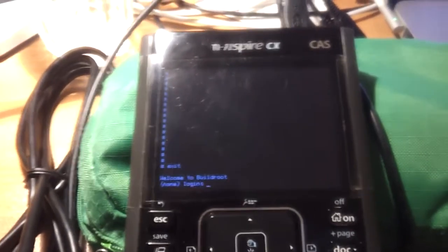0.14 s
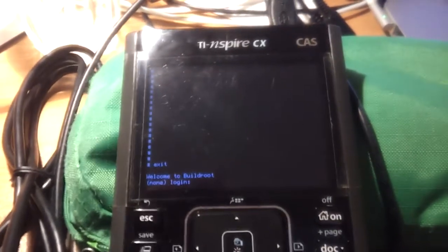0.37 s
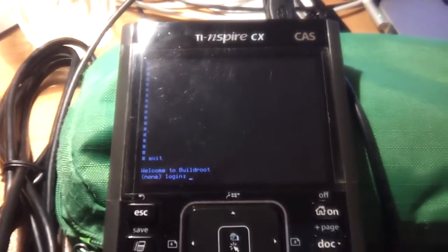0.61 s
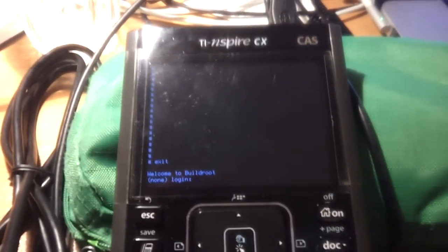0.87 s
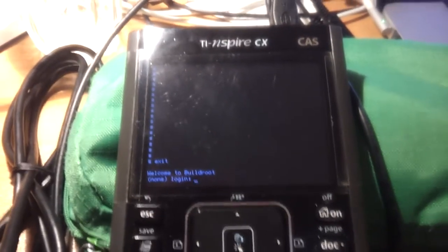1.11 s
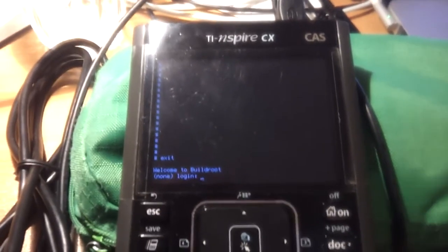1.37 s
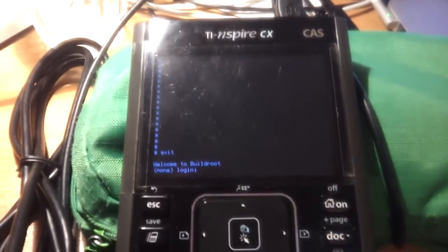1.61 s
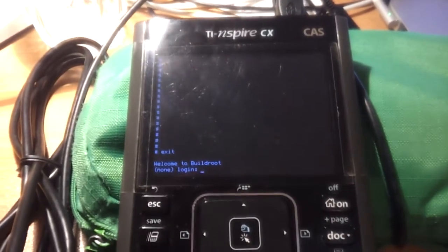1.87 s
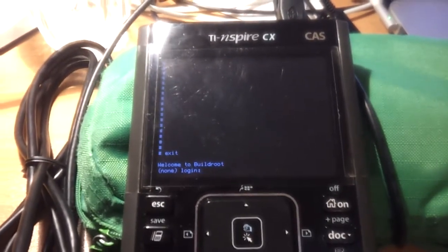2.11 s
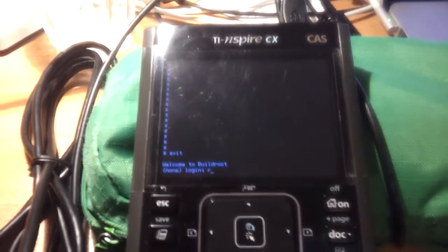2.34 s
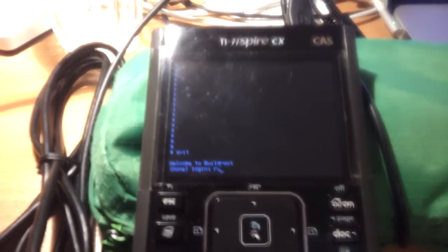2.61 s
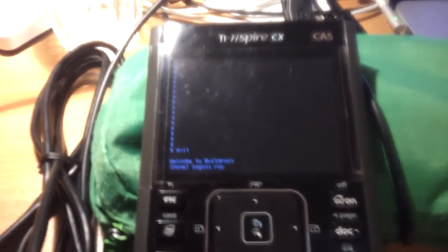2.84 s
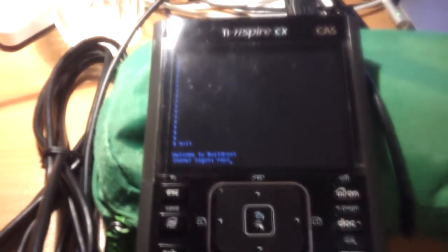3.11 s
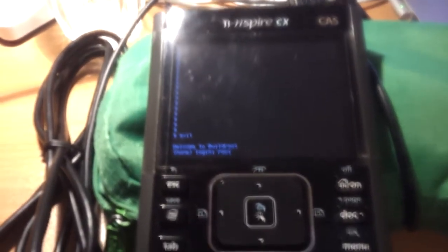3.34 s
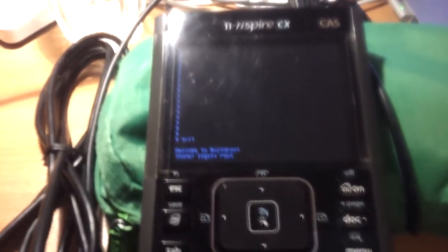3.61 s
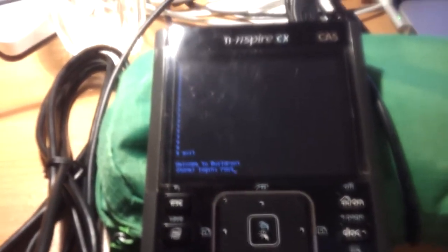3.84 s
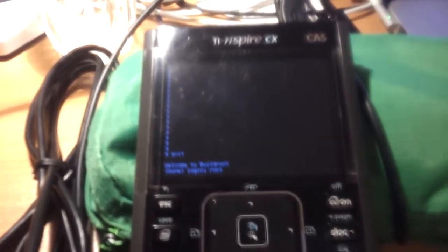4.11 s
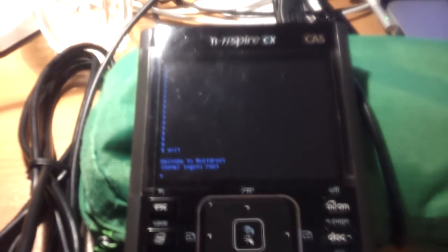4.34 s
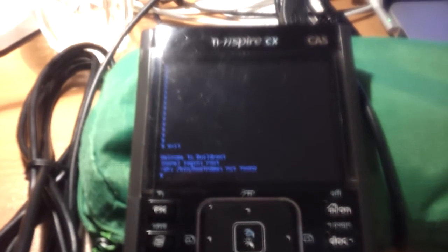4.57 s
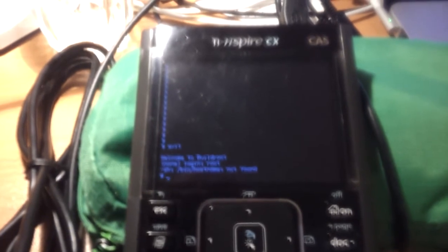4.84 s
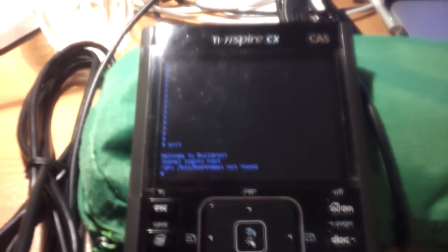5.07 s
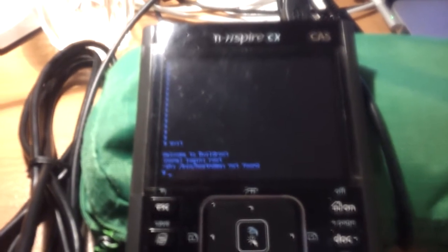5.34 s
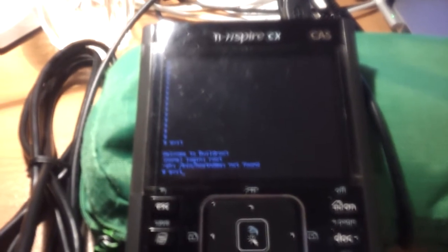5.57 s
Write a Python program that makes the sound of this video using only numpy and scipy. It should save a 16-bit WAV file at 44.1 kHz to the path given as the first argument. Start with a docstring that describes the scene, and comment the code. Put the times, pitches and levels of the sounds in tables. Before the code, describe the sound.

In a quiet room, one faint snap and handling bumps, then a quick burst of loud plastic key clicks and a later lone press.

```python
"""Typing in a quiet room

Someone types on a plastic keyboard just to the right of a hand-held camera. Each key lands, bounces and
springs back in short contacts: sparse pushes that drive decaying modes of cap, stem, plate and case.
The desk thuds (low modes), something snaps (struck modes), bumps are damped low swings and a finger rubs
the left microphone (grainy noise). A far motor drones (gliding sine) over rumble, hiss and a faint whine."""
import sys
import numpy as np
from scipy import signal
from scipy.fft import rfft, irfft
from scipy.io import wavfile
from scipy.ndimage import uniform_filter1d

SR = 44100
rng = np.random.default_rng(int(sys.argv[2]) if len(sys.argv) > 2 else 0)


def linear_from_db(decibels):
    """Turn decibels (scalar or array-like) into linear amplitude factors; 0 gives 1."""
    return 10 ** (np.asarray(decibels, float) / 20)


def wrap_up_sound(samples):
    """Save the sound to the file named by the first command line argument, as 16-bit audio."""
    columns = np.atleast_2d(samples).T
    # keep every value between -1 and 1, then stretch to whole-number steps
    tamed = np.clip(columns, -1, 1)
    steps = np.round(tamed * 32767).astype(np.int16)
    wavfile.write(sys.argv[1], SR, steps)


N = 251370

# Room rumble spectrum. Each row: frequency in Hz, relative level in dB.
RUMBLE_HZ_DB = [(12, -48), (20, -8.5), (59, 0.5), (90, 0.5), (119, 1), (188, -1), (218, -10.5), (299, -4.5),
                (361, -6.5), (549, -19), (636, -11.5), (2150, -39), (3000, -50.5), (3900, -67),
                (6600, -120)]
# Rumble swell. Each row: time in seconds, rms in dB midway between left and right.
RUMBLE_SWELL_S_DB = [(0.0, -59.5), (2.98, -56.5), (4.13, -60), (5.22, -56.5), (5.7, -59)]
# Hiss spectrum, falling steeply at the top. Each row: frequency in Hz, relative level in dB.
HISS_HZ_DB = [(12, -41), (20, -5), (105, -0.5), (331, -2.5), (549, -6.5), (936, -6.5), (1840, -11.5),
              (13900, -16.5), (15100, -15.5), (16400, -43)]
HISS_RMS_DB, WHINE_HZ, WHINE_PEAK_DB = -53, 14210, -72

# Snap modes. Each row: frequency in Hz, relative level in dB, t60 in seconds.
SNAP_MODES = [(2600, 3, 0.0028), (4700, -15, 0.0042), (6630, -9, 0.0038), (9800, -6.5, 0.0035),
              (12100, -6, 0.0035), (14200, -7, .003)]
SNAP_S, SNAP_PEAK_DB = .3449, -19.5
SNAP_PAN_DB = KEYS_PAN_DB = -7  # left minus right, before the far-side shading of SHADE_HZ_DB

# Finger on the left microphone. Each row: time in seconds, left rms in dB.
RUB_S_DB = [(.835, -61), (.85, -49), (.865, -43.5), (.874, -33.5), (.878, -49), (.895, -58), (.91, -75)]
# Bumps against the camera body. Each row: start in seconds, left starting level in dB,
# left minus right in dB, settled frequency in Hz, t60 in seconds.
THUDS = [(0.872, -33, 33, 71, 0.1), (0.98, -39, 20, 70, 0.077), (1.051, -27.5, 22, 110, 0.033),
         (5.381, -41, 7, 65, 0.28), (5.47, -46.5, 8, 60, 0.065)]

# Key contacts. Each row: start in seconds, cap peak at right in dB, then case and stem against cap in dB.
CONTACTS = [(2.1652, -9, -25, -5), (2.1688, -14.5, -24, 7.5), (2.1771, -0.5, -19, -8),
            (2.1879, -37, 1, -18), (2.2368, -29, -14, -6), (2.2453, -23, -17, -10), (2.253, -21, -16, -6),
            (2.257, -22, -17, -2), (2.2609, -24.5, -18, -10), (2.531, 0, -25.5, -8.5),
            (2.535, -8, -15.5, 5.5), (2.543, -24, 3, -14), (2.6023, -16.5, -16.5, -5),
            (2.6082, -23, -8, -6), (2.6155, -34.5, -10, 4), (2.682, -5.5, -38, 3.5),
            (2.6846, -10, -14.5, 1), (2.7016, -17, -0.5, -10), (2.692, -26, 2, -2), (2.7129, -32, 2, -11),
            (2.762, -24.5, -3.5, 2), (2.7771, -11.5, -12, -8.5), (2.9805, -19, -7.5, 10.5),
            (2.9829, -14.5, -24, 10.5), (2.9896, -29, -2, 6), (3.0422, -15, -13.5, 1.5),
            (3.0545, -28, -6, 2.5), (3.0575, -16, -15.5, -2.5), (3.0628, -23, -11, -11),
            (3.6668, -45, -5, -5), (4.2367, -14, -13, -3), (4.2383, -6.5, -8.5, -5.5),
            (4.2453, -10.5, -9, -7), (4.3134, -39.5, 3, -7.5), (4.3226, -33.5, 3, -1),
            (4.3379, -46, 4, -12), (5.3093, -42, -10, -5), (5.3672, -40.5, -10, 3),
            (5.3743, -29.5, -11, -3), (5.4724, -41, -13, 7), (5.4869, -35, 2.5, -5.5),
            (5.4961, -29.5, -18, 0), (5.508, -37, -21, -7)]
# Keystrokes. Each row: landing in seconds, plate boost in dB, desk blow in dB,
# best case frequency in Hz, best cap frequency in Hz.
KEYS = [(2.178, -1.5, -34, 1000, 3980), (2.532, 3.5, -42.5, 1070, 5700), (2.68, 0, -45.5, 1150, 5000),
        (2.983, 3, -34.5, 1370, 4780), (3.66, 3, -75, 1000, 3500), (4.237, 6, -30, 1000, 4200),
        (5.3, 3, -70, 980, 3400)]
# Modes of the four parts. Each row: frequency in Hz, relative level in dB, t60 in seconds.
CASE_MODES = [(720, -12, .02), (880, 0, .04), (1030, 0, .045), (1150, -1, .035), (1350, -1, .025)]
PLATE_MODES = [(1810, -38, .012), (1900, 8.5, 0.025), (1990, -1, 0.015), (2410, 19.5, 0.0049),
               (2770, 22, 0.0028)]
CAP_MODES = [(3600, -3, 0.012), (3900, 0.5, 0.009), (4320, 0, 0.012), (4870, 0.7, 0.0098),
             (5464, 1.5, 0.013)]
STEM_MODES = [(6300, -1, .006), (7300, 0, .007), (8200, 0, .007), (8900, -4, .005), (10400, -18, .003)]
PLATE_BEST_HZ, STEM_BEST_HZ = 2300, 7130
# the plate sits between stem and case and follows a share of each
PLATE_DB, PLATE_DB_PER_CASE_DB, PLATE_DB_PER_STEM_DB = 1, 0.33, 0.48
# a hard contact is clean and short, a soft one rattles longer
RATTLE_MS_AT_0_DB, RATTLE_MS_PER_DB = 1.7, 0.1053
# after a hard contact the cap chatters on: taps of uneven strength and gaps, weakening on the whole
HARD_DB, CHATTER_DB, CHATTER_FALL_DB, CHATTER_GAP_MS = -13, -30, 2.7, 7.1
CHATTER_SCATTER_DB, CHATTER_CASE_DB, CHATTER_STEM_DB = 2.5, -9, 3.5
# Shading of the far (left) microphone. Each row: frequency in Hz, left over right in dB.
SHADE_HZ_DB = [(300, 1), (700, 0), (1300, -3), (2400, -8), (4400, -5.5), (8000, -1.5), (15000, -1)]
LEFT_LAG_MS = 0.115

# Room tail bands. Each row: centre in Hz, t60 in seconds, relative level in dB.
ROOM_BANDS = [(480, 0.28, 17), (1000, 0.26, -2.5), (1960, 0.23, 5), (3880, 0.22, 0), (6430, 0.35, -1),
              (8100, 0.16, -3)]
ROOM_DB, ROOM_TOP_HZ = -20.5, 8900
# Desk top modes. Each row: frequency in Hz, relative level in dB, t60 in seconds.
DESK_MODES = [(42.4, -12, .2), (70, 3, 0.12), (117.9, 3.5, 0.3), (187, -8.5, 0.17), (244, -5, 0.18),
              (330, 5.5, 0.19), (406, 12, 0.062), (502, 8, 0.043)]
DESK_SPREAD_MS = 15.3  # the blow reaches the desk through feet and cloth
# Far motor. Each row: time in seconds, frequency in Hz, rms in dB midway between left and right.
DRONE_S_HZ_DB = [(4.45, 114.6, -62), (4.96, 127.4, -55.5), (5.114, 128.4, -55.5), (5.7, 112, -58.5)]


def along(table, at):
    """Reads a two-column table on a log-frequency axis."""
    hz, value = np.transpose(table)
    return np.interp(np.log(np.maximum(at, 1)), np.log(hz), value)


def colour(x, table):
    """Filters by (Hz, dB) points."""
    size = x.shape[-1]
    bin_hz = np.arange(size // 2 + 1) * SR / size
    return irfft(rfft(x) * linear_from_db(along(table, bin_hz)), size)


def unit(x):
    """Scales to rms 1."""
    return x / np.sqrt(np.mean(x ** 2))


def add(track, s, sound):
    """Mixes a short sound in at s seconds."""
    start = int(s * SR)
    track[:, start:start + sound.shape[1]] += sound[:, :N - start]


def ring(modes, push, chance, best_hz, focus_db=12):
    """Decaying modes driven by a push, strongest near best_hz; chance weights and tunes them. Peak 1."""
    hz, db, t60_s = np.transpose(modes)[:, :, None]
    t = np.arange(len(push)) / SR
    level_chance, tune_chance = chance[:, :len(modes), None]
    db = db - focus_db * np.abs(np.log2(hz / best_hz))  # focus_db per octave
    gains = linear_from_db(db + 2.5 * level_chance)
    tones = np.sin(2 * np.pi * hz * (1 + .02 * tune_chance) * t)
    response = np.sum(gains * tones * 1000. ** (-t / t60_s), axis=0)
    out = signal.fftconvolve(push, response)[:len(push)]
    # a part radiates little outside the range of its modes
    band = signal.butter(3, [.8 * hz.min(), 1.1 * hz.max()], "band", fs=SR, output="sos")
    out = signal.sosfilt(band, out)
    return out / np.max(np.abs(out))


def background(t):
    """Rumble is shared by both microphones, stronger left; hiss is separate in each; a faint whine wavers."""
    rumble = unit(colour(rng.standard_normal(N), RUMBLE_HZ_DB))
    rumble = rumble * linear_from_db(np.interp(t, *np.transpose(RUMBLE_SWELL_S_DB)))
    hiss = linear_from_db(HISS_RMS_DB) * unit(colour(rng.standard_normal((2, N)), HISS_HZ_DB))
    waver = unit(uniform_filter1d(rng.standard_normal(N), size=600))
    whine = linear_from_db(WHINE_PEAK_DB) * np.sin(2 * np.pi * np.cumsum(WHINE_HZ + 30 * waver) / SR)
    return rumble * linear_from_db([[2.5], [-2.5]]) + hiss + whine * linear_from_db([[3], [-3]])


def snap():
    """One impulse sets off a few quickly damped modes nearby."""
    track, impulse = np.zeros((2, N)), signal.unit_impulse(2500)
    sound = ring(SNAP_MODES, impulse, rng.standard_normal((2, len(SNAP_MODES))), 2500, focus_db=0.5)
    add(track, SNAP_S, sound * linear_from_db([[SNAP_PEAK_DB + SNAP_PAN_DB], [SNAP_PEAK_DB]]))
    return track


def rub(t):
    """Skin slides over the left port, grainy and narrow, and stops with a tick."""
    band = signal.butter(6, [4900, 7100], "band", fs=SR, output="sos")
    grains = unit(signal.sosfilt(band, rng.standard_normal(N) ** 3))
    level_db = np.interp(t, *np.transpose(RUB_S_DB), left=-120, right=-120)
    return grains * linear_from_db(level_db) * linear_from_db([[0], [-14]])


def thuds():
    """One damped low swing each, quick at first and slowing."""
    track, t = np.zeros((2, N)), np.arange(SR // 4) / SR
    for s, db, pan_db, hz, t60_s in THUDS:
        turns = hz * t + 0.28 * (1 - np.exp(-t / 0.0012))
        swing = -np.sin(2 * np.pi * turns) * 1000. ** (-t / t60_s)
        add(track, s, swing * linear_from_db([[db], [db - pan_db]]))
    return track


def chatter(count=7):
    """Rows like CONTACTS for the small taps that follow each hard contact."""
    rows = []
    for s, db, *_ in CONTACTS:
        if db > HARD_DB:
            gaps_ms = CHATTER_GAP_MS * (.5 + rng.random(count))
            scatter_db = CHATTER_SCATTER_DB * rng.standard_normal((3, count))
            times_s = s + np.cumsum(gaps_ms) / 1000
            levels_db = db + CHATTER_DB - CHATTER_FALL_DB * np.arange(count) + scatter_db[0]
            rows += zip(times_s, levels_db, CHATTER_CASE_DB + scatter_db[1], CHATTER_STEM_DB + scatter_db[2])
    return rows


def contact_push(db, t_ms):
    """A first tap, a dying rattle of smaller ones and the scrape of the stem in its guide."""
    noise = rng.standard_normal(len(t_ms))
    rattle_ms = np.clip(RATTLE_MS_AT_0_DB - RATTLE_MS_PER_DB * db, .1, 12)
    # cubed noise is sparse: separate small impacts rather than a hiss
    # a long rattle is a glancing contact, so its first tap stands out less
    push = 0.02 * rattle_ms * noise ** 3 * np.exp(-t_ms / rattle_ms)
    push += 0.0073 * np.roll(noise, 99) * np.exp(-t_ms / 14)
    push[0] = 1
    return push


def keys():
    """Each contact rings case, plate, cap and stem; the far (left) microphone hears it later and weaker."""
    track, t_ms = np.zeros((2, N)), np.arange(2500) * 1000 / SR
    for s, db, case_db, stem_db in CONTACTS + chatter():
        push, chance = contact_push(db, t_ms), rng.standard_normal((2, 4, 2, 6))
        # a contact may come up to 16 ms ahead of its key's landing
        _, boost_db, _, case_hz, cap_hz = [key for key in KEYS if key[0] < s + .016][-1]
        plate_db = PLATE_DB + boost_db + PLATE_DB_PER_CASE_DB * case_db + PLATE_DB_PER_STEM_DB * stem_db
        parts = [(CASE_MODES, case_db, case_hz), (PLATE_MODES, plate_db, PLATE_BEST_HZ),
                 (CAP_MODES, 0, cap_hz), (STEM_MODES, stem_db, STEM_BEST_HZ)]
        near = far = 0
        for k, (modes, part_db, best_hz) in enumerate(parts):
            near = near + linear_from_db(part_db) * ring(modes, push, chance[0, k], best_hz)
            aside = chance[0, k] + .5 * chance[1, k]  # the parts radiate unevenly
            far = far + linear_from_db(part_db) * ring(modes, push, aside, best_hz)
        add(track[1:], s, linear_from_db(db) * near[None])
        add(track[:1], s + LEFT_LAG_MS / 1000, linear_from_db(db + KEYS_PAN_DB) * far[None])
    return track


def shade(track):
    """Colours the left channel as the microphone on the far side hears it."""
    return np.array([colour(track[0], SHADE_HZ_DB), track[1]])


def room(x):
    """Desk and walls send back a short diffuse tail, unrelated left and right."""
    t = np.arange(SR // 3) / SR
    tail = 0
    for hz, t60_s, db in ROOM_BANDS:
        band = signal.butter(2, [hz / 1.4, hz * 1.4], "band", fs=SR, output="sos")
        noise = signal.sosfilt(band, rng.standard_normal((2, len(t))))
        tail = tail + linear_from_db(db) * noise * 1000. ** (-t / t60_s)
    # soft surfaces swallow the top
    tail = signal.sosfilt(signal.butter(8, ROOM_TOP_HZ, fs=SR, output="sos"), tail)
    tail = tail * (1 - np.exp(-t / 0.003))
    tail = tail / np.sqrt(np.sum(tail ** 2) / 2)  # mean energy 1 per channel
    return linear_from_db(ROOM_DB) * signal.fftconvolve(x[None], tail, axes=1)[:, :N]


def desk():
    """The finger leans on the key for a moment and the desk top swings after it."""
    track, t_ms = np.zeros((2, N)), np.arange(SR // 3) * 1000 / SR
    for s, _, db, *_ in KEYS:
        push = rng.standard_normal(len(t_ms)) * t_ms * np.exp(-2 * t_ms / DESK_SPREAD_MS)
        swing = ring(DESK_MODES, push, rng.standard_normal((2, len(DESK_MODES))), 110, focus_db=1)
        add(track, s, swing * linear_from_db([[db + 1.2], [db - 1.2]]))
    return track


def drone(t):
    """A far motor swells and sinks as one low tone gliding up, then down."""
    s, hz, db = np.transpose(DRONE_S_HZ_DB)
    tone = np.sqrt(2) * np.sin(2 * np.pi * np.cumsum(np.interp(t, s, hz)) / SR)
    return tone * linear_from_db(np.interp(t, s, db, left=-120)) * linear_from_db([[1.5], [-1.5]])


def scene():
    """Background, handling, snap and keys with their room and desk, and the motor."""
    t = np.arange(N) / SR
    direct = shade(snap() + keys())
    return background(t) + rub(t) + thuds() + direct + room(direct[1]) + desk() + drone(t)


def band_limit(x):
    """A steep low-pass at the top of the band."""
    return signal.sosfilt(signal.butter(12, 16990, fs=SR, output="sos"), x)


def record(dry):
    """The converter clips at full scale."""
    mix = np.clip(dry, -1, 1)
    return band_limit(mix)


dry = scene()
out = record(dry)
wrap_up_sound(out)
```